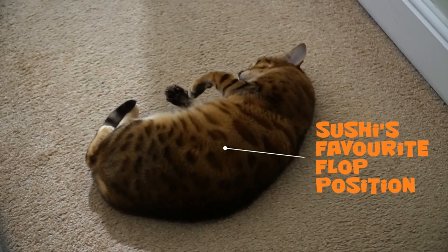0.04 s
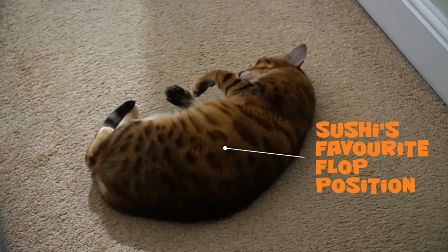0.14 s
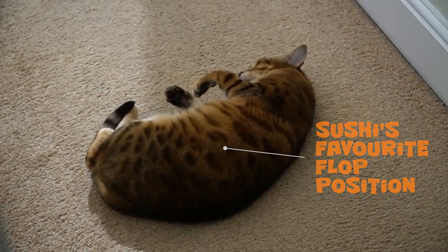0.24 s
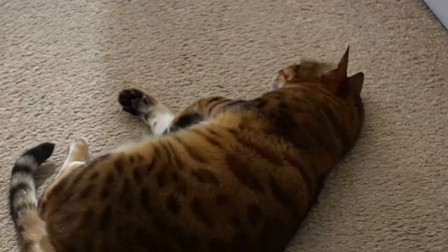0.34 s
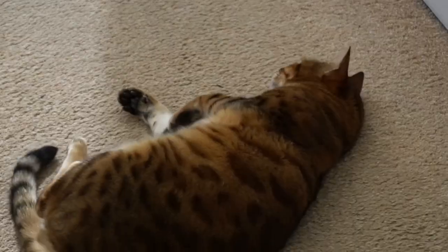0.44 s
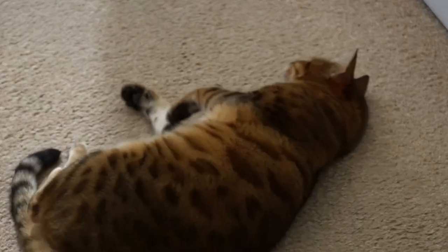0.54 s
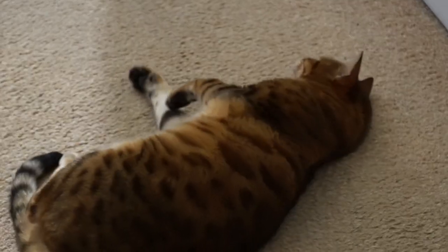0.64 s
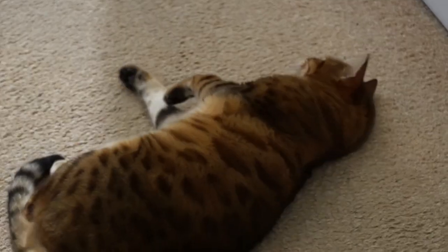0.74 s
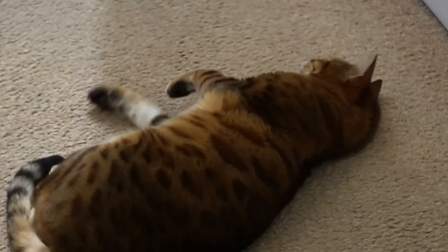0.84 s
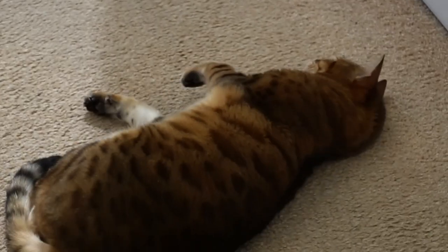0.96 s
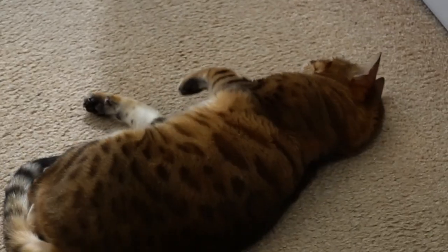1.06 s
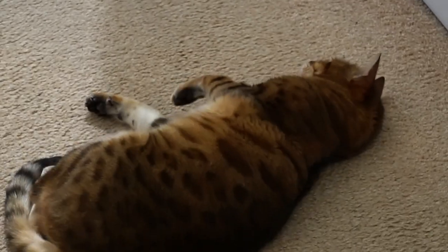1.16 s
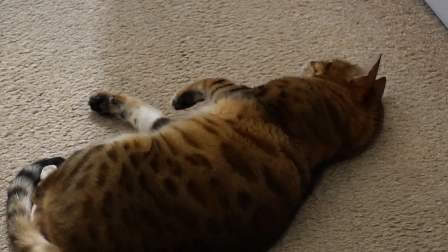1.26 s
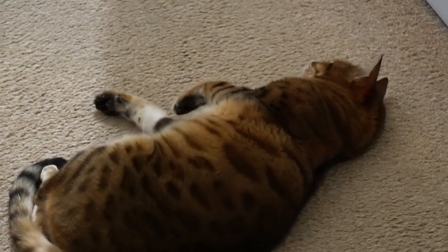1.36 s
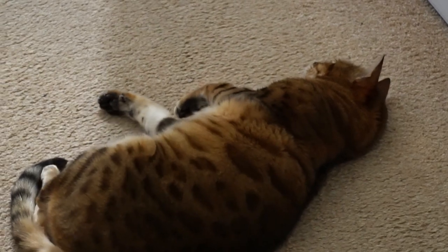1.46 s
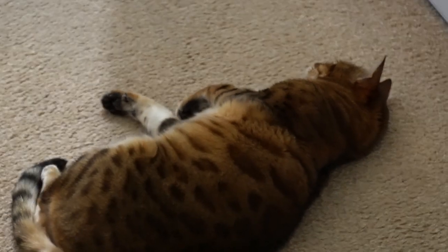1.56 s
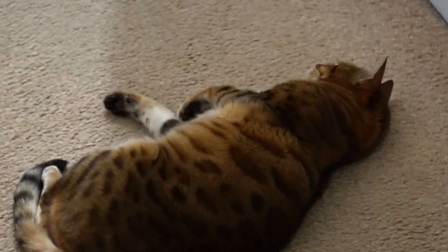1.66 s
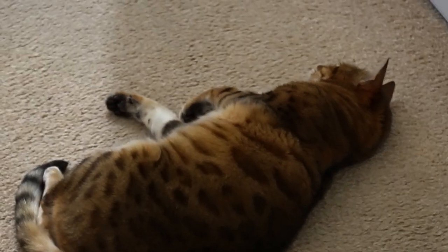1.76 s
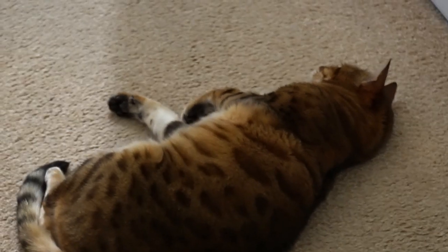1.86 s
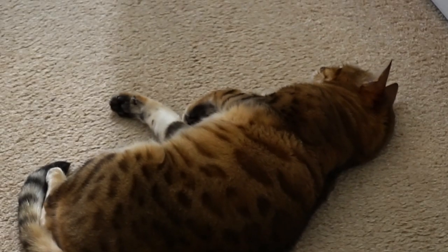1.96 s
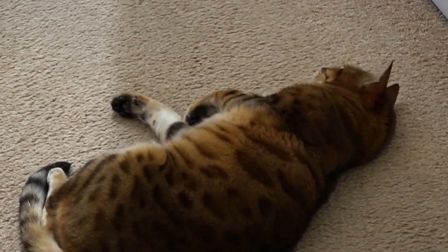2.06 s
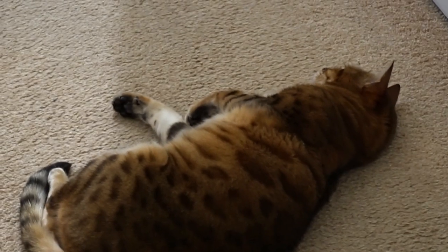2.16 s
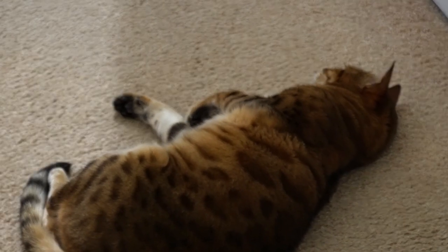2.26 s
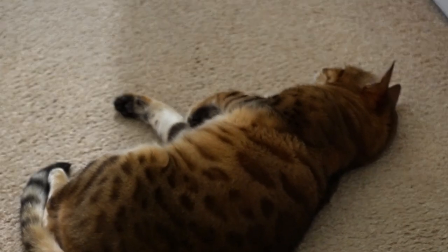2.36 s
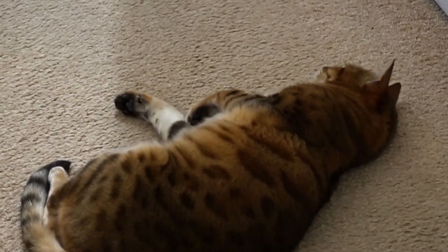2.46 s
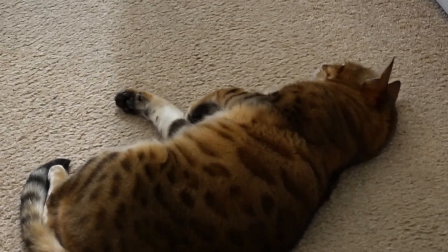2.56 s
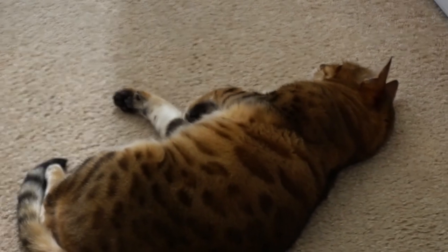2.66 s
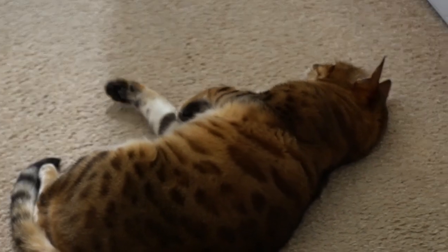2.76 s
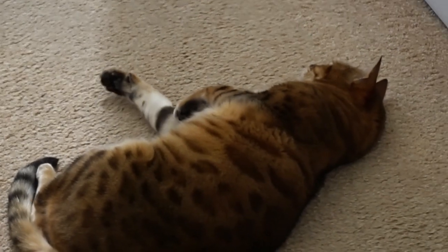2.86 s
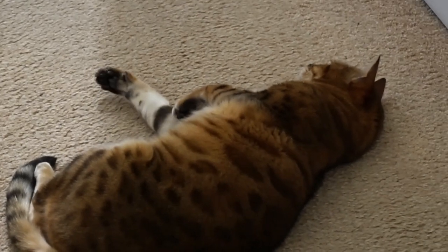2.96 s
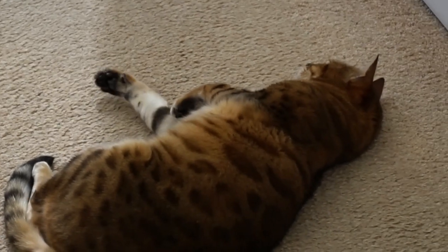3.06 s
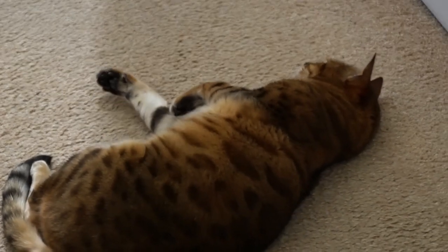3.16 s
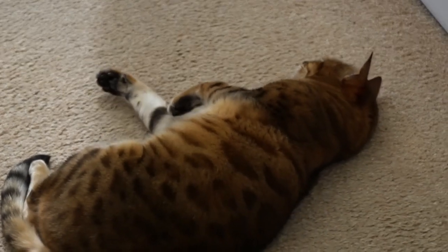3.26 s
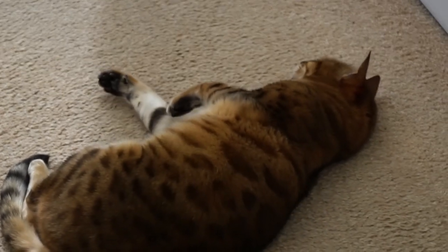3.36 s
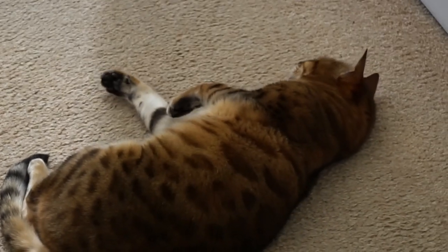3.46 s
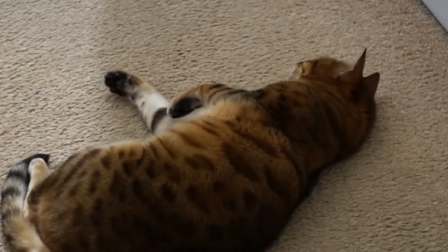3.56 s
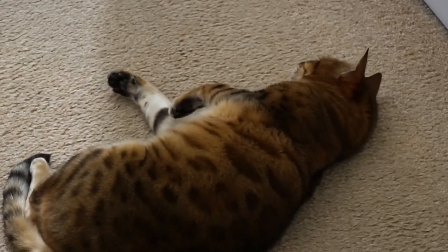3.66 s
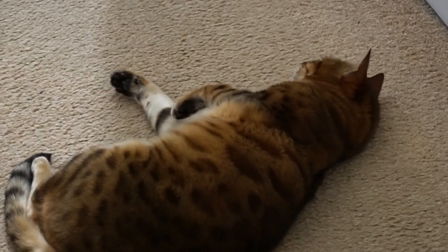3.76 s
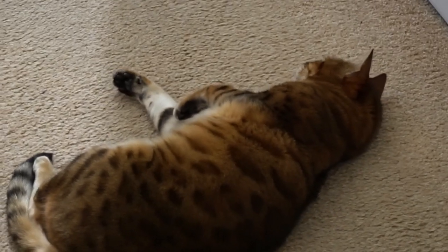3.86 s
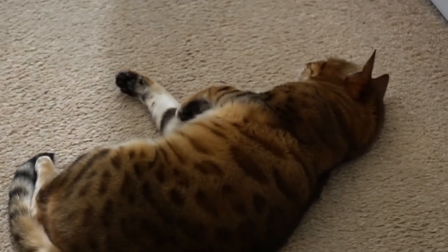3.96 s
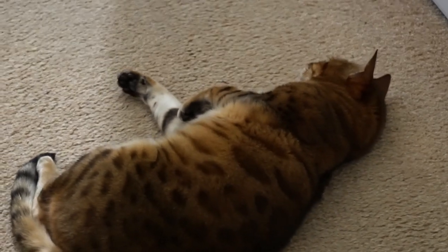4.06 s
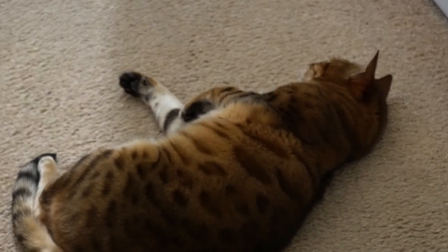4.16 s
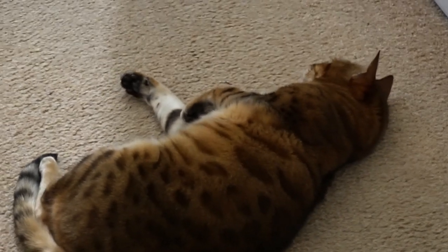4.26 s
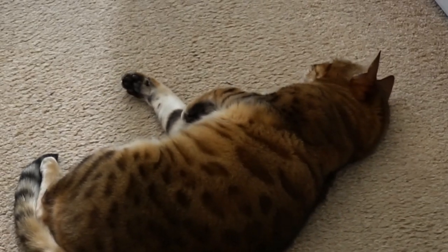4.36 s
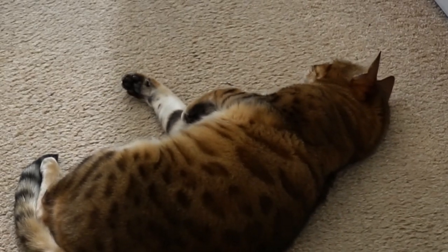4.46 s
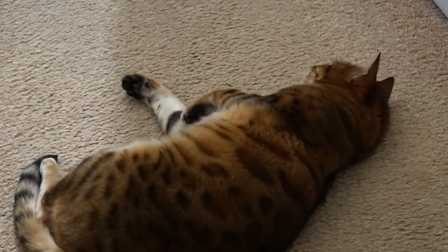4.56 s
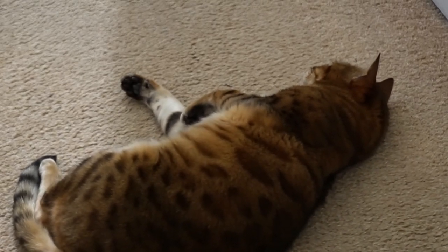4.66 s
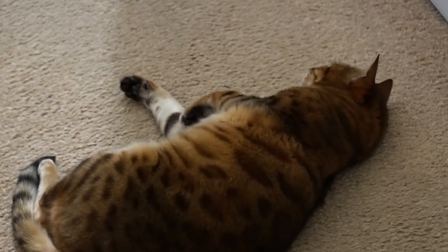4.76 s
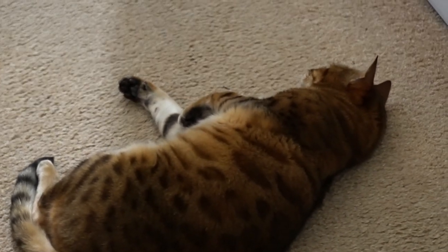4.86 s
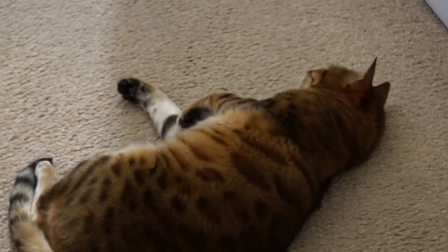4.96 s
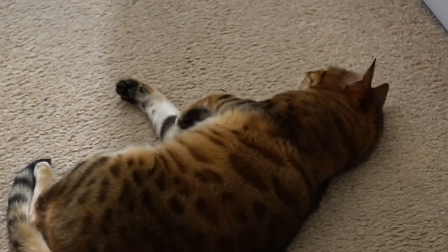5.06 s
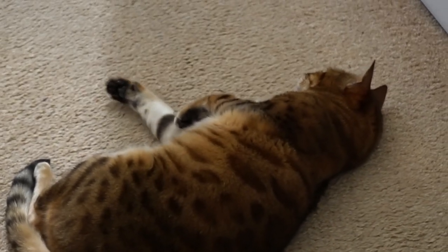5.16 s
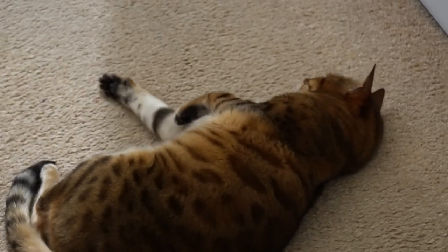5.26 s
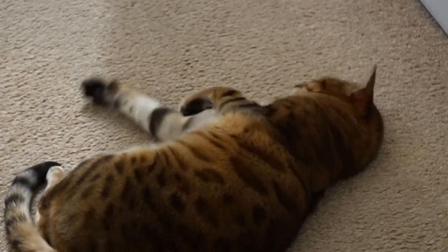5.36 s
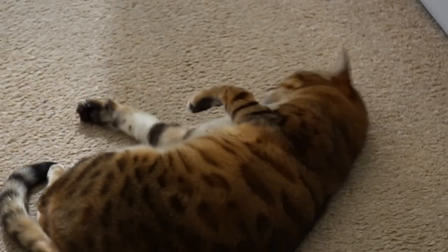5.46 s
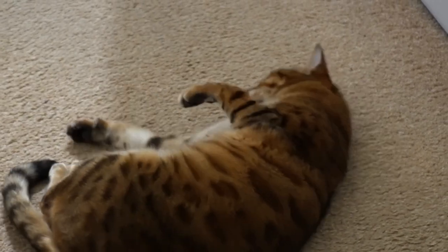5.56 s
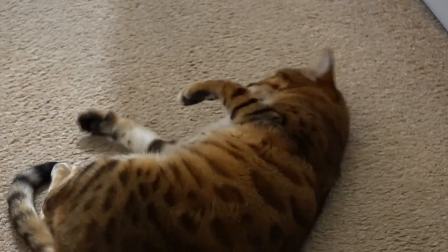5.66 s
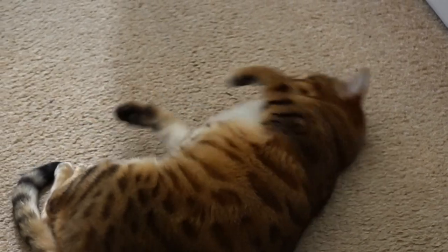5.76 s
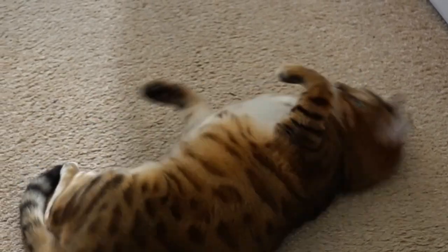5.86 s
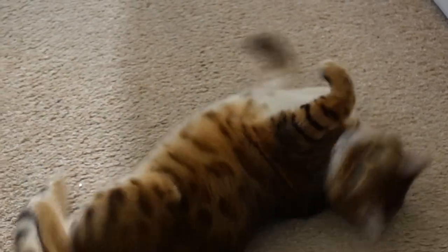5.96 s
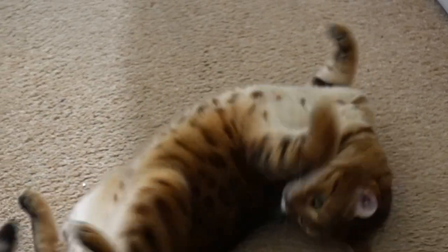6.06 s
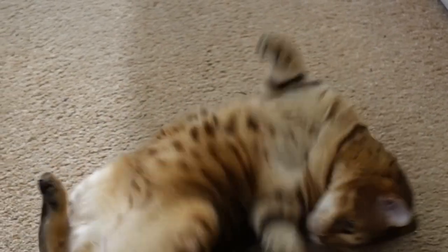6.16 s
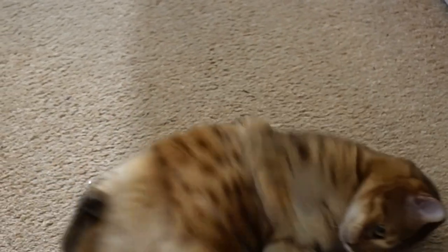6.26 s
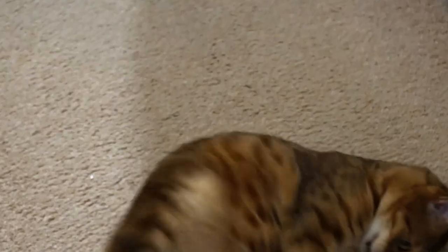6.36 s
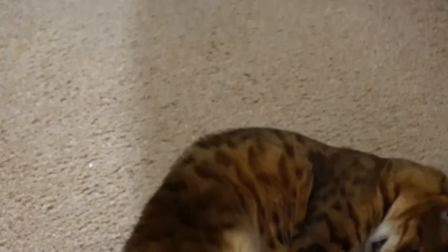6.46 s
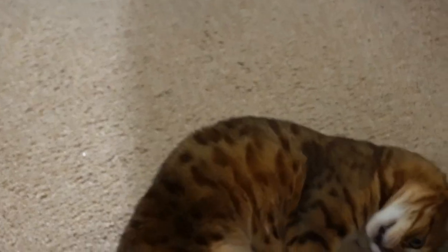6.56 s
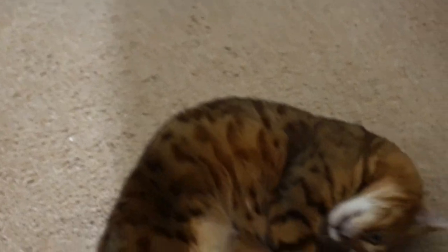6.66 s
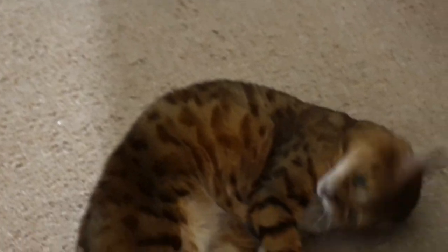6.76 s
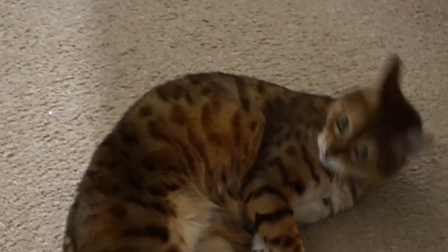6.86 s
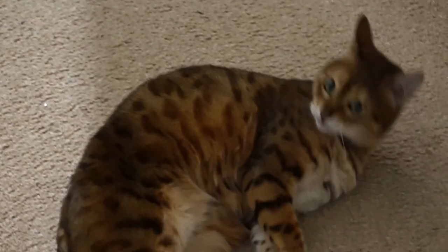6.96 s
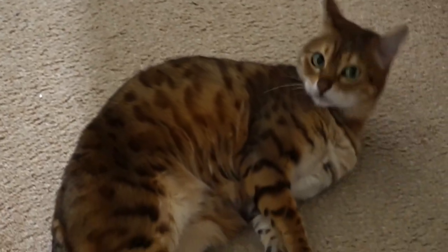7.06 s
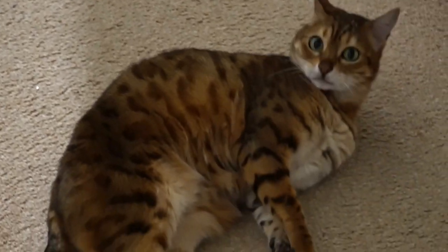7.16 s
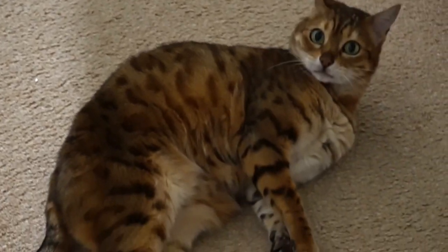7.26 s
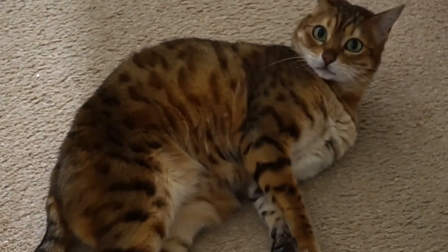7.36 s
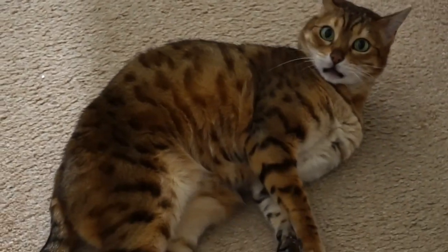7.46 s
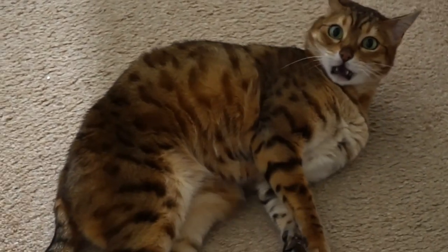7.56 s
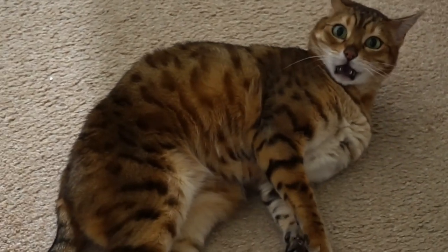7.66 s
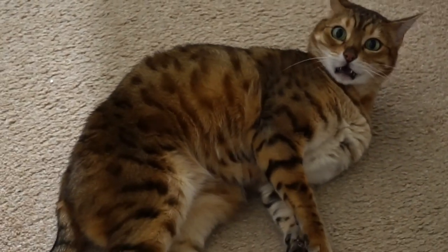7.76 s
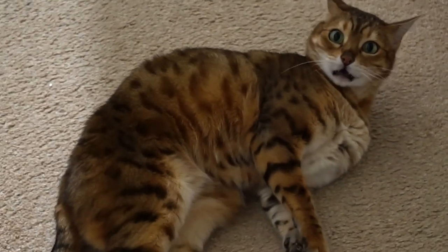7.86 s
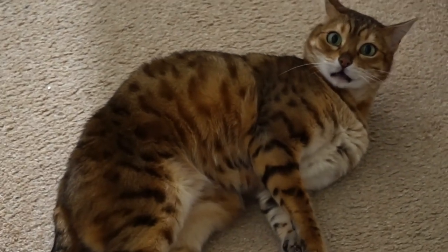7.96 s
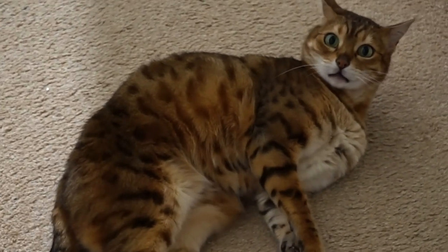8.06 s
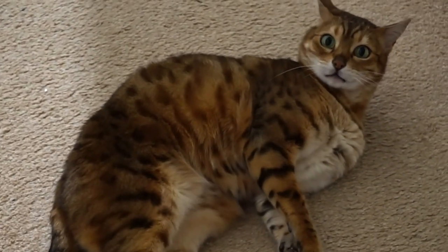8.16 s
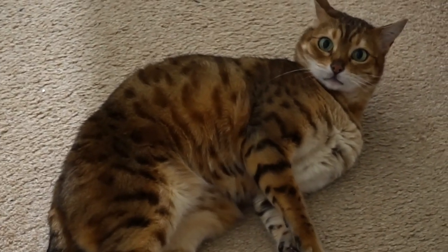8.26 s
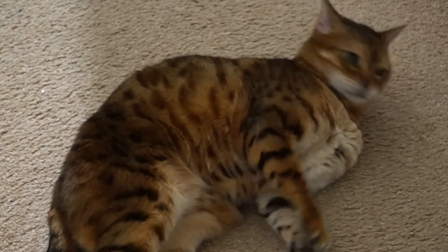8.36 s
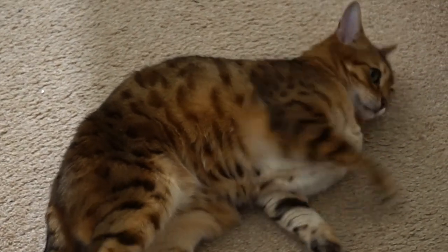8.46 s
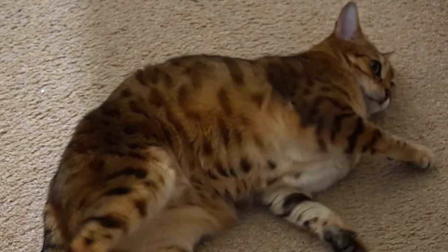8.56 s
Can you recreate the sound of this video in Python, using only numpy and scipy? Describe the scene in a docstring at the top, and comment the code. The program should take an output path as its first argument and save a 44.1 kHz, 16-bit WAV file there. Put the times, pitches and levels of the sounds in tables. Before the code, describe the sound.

A quiet carpeted room, with soft low house noise, faint wavering hum and thin hiss; the hiss drops slightly at about 0.4 seconds. At 0.5 a close cat starts hoarsely, with a rustle and lip smack, cracks upward and breaks into a bright, piercing meow that slides down until 1.1. Light fur scuffs and small ticks are scattered from 1.8 to 2.8. A second meow, at 3.1 to 3.8, rises fast and falls smoothly. Mostly calm follows, with sparse rustles, then a tiny closed-mouth grunt at 5.3. Rustling from 5.8 leads to a dull, soft floor thump at 6.25 as the cat rolls over, with weak settling bumps. A shorter meow comes at 6.4 to 6.9, then more rustles. The loudest, fullest meow runs from 7.4 to 8.2, closing with a barely perceptible high airy whistle. Each call leaves a short room tail; gentle low rumble swells near the end.

```python
"""A cat lying on a carpet meows four times in a quiet room; each call rises, then slides down as the mouth shuts.
The voice is a stack of harmonics, shaped by moving mouth and throat resonances and roughened by noise.
Puffs of noise make the rustles, short rings make the lip smacks and the thump as the cat rolls over.
Single gliding tones make a short grunt and a thin whistle of air; the room adds a fading tail.
Filtered noise and wavering tones make the steady hum and hiss of the house."""
import sys
import numpy as np
from scipy import signal
from scipy.fft import rfft, irfft
from scipy.io import wavfile
from scipy.ndimage import uniform_filter1d, minimum_filter1d

SR = 44100
rng = np.random.default_rng(int(sys.argv[2]) if len(sys.argv) > 2 else 0)


def output_pcm(signal):
    """Save a mono or channel-first signal as 16-bit PCM at the path in sys.argv[1].

    Samples are clipped to [-1, 1] before scaling.
    """
    pcm = np.clip(np.atleast_2d(signal).T, -1, 1) * 32767
    wavfile.write(sys.argv[1], SR, np.round(pcm).astype(np.int16))


N = 379701  # length of the scene in samples

# Levels of the cat's sounds (voice, rustles, smacks, thump) are set before scene() mixes them.
# House noise: spectrum, relative [f/Hz, level/dB per Hz]
HOUSE_SPECTRUM = [(14, -36), (38, 4.5), (62, -1.5), (120, -4.5), (160, 2.5), (200, -2), (300, -3),
                  (500, -8), (760, -10), (1500, -16), (2800, -23), (3900, -18.5), (4450, -25),
                  (5200, -31.5)]
# Treble hiss: spectrum, relative [f/Hz, level/dB per Hz]
HISS_SPECTRUM = [(5200, -0.5), (7000, -3), (10000, -6), (13000, -5), (15900, -5)]
# Depth of the drifting patches in the house noise [f/Hz, depth/dB]
PATCH_DEPTHS = [(100, .4), (500, 1.6), (2500, 1.4), (5000, .5), (16000, .3)]
# Swells of the low rumble [t/s, half length/s, height/dB]
RUMBLE_SURGES = [(.6, .2, 6.5), (5.8, .3, 0.5), (7.8, .2, 11), (8.5, 0.14, 14)]
# Wavering hum lines [f/Hz, level/dB]
HUM_LINES = [(161.5, -63), (236.9, -64.5), (726.7, -71), (1114, -72.5), (3854, -81), (4307, -77.5),
             (8156, -91.5), (12500, -86)]

# Voiced stretches, one table each; the first meow breaks in two after a hoarse start
# [t/s, pitch f/Hz, first mouth resonance f/Hz, its level/dB, second resonance f/Hz, its level/dB]
MEOW_PATHS = [
    [(0.46, 271, 1360, -69, 2560, -78), (0.476, 280, 1370, -58, 2580, -70),
     (0.494, 303, 1390, -45, 2580, -86), (0.522, 319.4, 1420, -42, 2450, -75),
     (0.54, 346.6, 1580, -43, 2450, -57), (0.554, 375, 1750, -45, 2440, -60),
     (0.568, 404, 1800, -46, 2420, -42), (0.6, 486, 1883, -43, 2400, -34),
     (0.618, 552, 1730, -52, 2680, -34), (0.635, 575.9, 1630, -42, 2850, -39)],
    [(0.625, 571, 1680, -43, 2760, -52), (0.681, 554, 1700, -36, 2900, -12.5),
     (0.701, 563.7, 1930, -31, 2730, -17.5), (0.719, 539, 2080, -20, 2720, -13),
     (0.733, 532, 2050, -28, 2640, -16), (0.753, 521, 1970, -21, 2590, -20.5),
     (0.785, 500.7, 1915, -20, 2410, -19.5), (0.833, 464.7, 1430, -23, 2400, -37),
     (0.849, 471.2, 1480, -26, 2430, -32.5), (0.915, 427.2, 1430, -38, 2430, -49.5),
     (0.991, 397.6, 1200, -45.5, 2430, -54.5), (1.015, 383, 1220, -49, 2480, -58),
     (1.031, 343.5, 1230, -49, 2470, -58), (1.09, 317.6, 1360, -61, 2520, -68)],
    [(3.08, 261, 1850, -61, 2340, -63.5), (3.144, 309.7, 1270, -58, 2270, -72),
     (3.164, 370, 1240, -47, 2190, -66.5), (3.194, 395, 1320, -31, 2180, -58),
     (3.21, 443, 1570, -36, 2220, -33), (3.23, 466, 1660, -24.5, 2380, -45.5),
     (3.266, 503.4, 1670, -28.5, 2500, -28), (3.31, 520.5, 2010, -29, 2580, -25.5),
     (3.404, 480.2, 1760, -24.5, 2480, -32), (3.536, 437.6, 1300, -26, 2140, -44.5),
     (3.634, 414, 1256, -27, 2056, -48.5), (3.716, 353.7, 1346, -50, 2140, -61),
     (3.746, 308, 1319, -51.5, 2280, -72), (3.8, 314.1, 1286, -59, 2380, -81)],
    [(6.37, 334, 1520, -43, 2430, -65), (6.392, 375, 1400, -33.5, 2450, -44),
     (6.426, 440, 1540, -41, 2470, -32.5), (6.498, 475.9, 1800, -28, 2640, -25),
     (6.568, 484.6, 1850, -26.5, 2770, -23), (6.588, 483, 1870, -22.5, 2760, -34),
     (6.616, 485, 1780, -29.5, 2520, -26), (6.646, 453.7, 1630, -30.5, 2390, -34.5),
     (6.678, 449.5, 1310, -31, 2180, -34), (6.702, 439, 1330, -33, 2180, -39),
     (6.744, 379.3, 1300, -39.5, 2180, -56), (6.792, 372.9, 1360, -61, 2190, -52),
     (6.812, 340, 1390, -49.5, 2200, -56), (6.86, 326.0, 1380, -53, 2270, -66)],
    [(7.43, 270.5, 1400, -72, 2670, -81), (7.452, 266.4, 1350, -50.5, 2210, -70),
     (7.54, 413.6, 1596, -17.5, 2470, -38.5), (7.598, 457.4, 1790, -10, 2670, -17),
     (7.642, 468.4, 1810, -14.5, 2700, -16.5), (7.674, 473.1, 1890, -11, 2570, -20.5),
     (7.732, 468, 1900, -12, 2720, -26.5), (7.802, 458.3, 1567, -18, 2410, -25),
     (7.876, 449, 1280, -11.5, 2300, -42), (7.888, 449.7, 1360, -18, 2250, -31),
     (7.95, 444.2, 1400, -22.5, 2140, -27), (8.058, 424.2, 1540, -36.5, 2105, -55),
     (8.142, 340, 1236, -43, 2170, -66), (8.19, 322, 1300, -45.5, 2340, -68)],
]
# Colour of each stretch at REFERENCE_DB [lowest tone level/dB, its octave level/dB, third resonance level/dB,
# its f/Hz with the mouth open, upper throat resonance level/dB, its f/Hz at the start, its f/Hz at the end]
MEOW_COLOURS = [(-44, -38.5, -28, 3900, -68, 5500, 5400), (-40, -34, -42, 3800, -70.5, 5500, 6840),
                (-45, -35.5, -45.5, 3740, -83, 4940, 6100), (-45, -44, -32.5, 3760, -78, 4400, 7300),
                (-47.5, -39.5, -62.5, 3700, -75, 4900, 7000)]
# Drift over each stretch as sound moves from mouth to nose
# [lowest tone change/dB, its octave change/dB, lips part t/s]
NOSE_DRIFTS = [(-5, -5, .555), (7.5, 14, .655), (0.5, -0.5, 3.17), (2, 5.5, 6.383), (8.5, 5, 7.485)]
# One swell of the upper resonance in each stretch [t/s, half length/s, height/dB]
THROAT_SWELLS = [(0.605, 0.044, 20), (0.793, 0.12, 15.5), (3.448, 0.19, 17.5), (6.58, 0.12, 13),
                 (7.82, 0.32, 16.5)]
# Fixed throat modes that follow the upper resonance [f/Hz, width/Hz, level against it/dB]
TOP_MODES = [(5240, 200, -5), (9000, 2400, -36), (14300, 2000, -23.5)]
# Dip between the third and upper resonances [f/Hz, half width/Hz, height/dB]
THROAT_GAP = (4750, 730, -5)
# Nose resonance: lifts the lowest tone as it slides past [f/Hz, half width/Hz, height/dB]
NOSE_LIFT = (387, 100, 4.2)
# Moments when the voice catches [t/s, half length/s, added roughness 0-1]
VOICE_CATCHES = [(.52, .04, .15), (.585, .035, .5), (.715, .01, .18), (.8, .08, .12), (1.04, .05, .1),
                 (3.2, .05, .1), (3.72, .04, .1), (6.41, .02, .08), (6.455, .012, .2), (6.62, .02, .25),
                 (7.56, .04, .06)]
# How long the room rings: time to fall by 60 dB [f/Hz, fall time/s]
ROOM_FALL = [(200, 0.52), (500, 0.34), (1200, 0.3), (3000, 0.23), (8000, 0.23)]

# Rustles of fur and carpet [t/s, level/dB, length/s (held to 0.01-0.09), slope above 1.5 kHz/dB per octave]
RUSTLE_EVENTS = [(0.521, -35, 0.031, 3.5), (0.562, -31.5, 0.079, 2.5), (1.028, -40.5, 0.053, 7.5),
                 (1.842, -35.5, 0.029, -20), (1.893, -34, 0.027, -10), (1.949, -40, 0.034, -13),
                 (2.024, -44, 0.027, -5), (2.233, -28.5, 0.058, 0.5), (2.549, -58, 0.052, -1),
                 (2.631, -35.5, 0.021, -6), (2.782, -39.5, 0.021, -17), (3.927, -31.5, 0.025, -29.5),
                 (4.496, -40.5, 0.044, -1), (5.372, -37, 0.051, -3), (5.832, -37.5, 0.06, -4),
                 (5.997, -39.5, 0.088, -3), (6.159, -36.5, 0.071, -5), (6.283, -37, 0.11, 3.5),
                 (6.791, -40, 0.035, 6.5), (7.133, -34, 0.034, -7), (7.326, -42.5, 0.058, -13)]
# Rustle spectrum, relative [f/Hz, level/dB per Hz]
RUSTLE_SPECTRUM = [(120, -34), (250, 1), (550, -13.5), (900, -1), (1400, -13.5), (2200, -9.5),
                   (3200, -16.5), (4100, -12.5), (5300, -31.5), (15000, -47.5)]
# Lip smacks and ticks [t/s, level/dB, ring f/Hz, share of broad click]
SMACK_EVENTS = [(0.5674, -45, 2310, 0.14), (0.576, -28, 2340, 0.086), (1.022, -33.5, 3820, 0.083),
                (2.241, -34, 1470, 0.16), (3.162, -39, 3624, .1), (6.3833, -32.5, 3720, 0.3),
                (7.472, -44, 4440, 0.42), (8.135, -42, 13300, 0.089)]
# Short closed-mouth grunt [t/s, pitch f/Hz, level/dB]
GRUNT_PATH = [(5.31, 450, -82), (5.332, 400, -45.5), (5.39, 300, -51), (5.42, 297, -59)]
# Landing and two settling bumps [t/s, peak level/dB]
THUMP_EVENTS = [(6.2494, -15.5), (6.285, -41), (6.454, -31.5)]
# Rings of the floor under the carpet [f/Hz, relative level/dB, time to fall by 60 dB/s]
FLOOR_RINGS = [(98.5, -14, 0.25), (119, 5, 0.14), (223, 2.5, 0.077), (273, 13.5, 0.034), (322, 2, 0.1),
               (441, -6, 0.25), (470, 5.5, 0.047)]
# Thin whistle of air as the last meow closes [t/s, pitch f/Hz, level/dB]
WHISTLE_PATH = [(7.88, 14800, -84), (7.97, 14500, -80), (8.07, 13300, -81), (8.16, 13150, -81)]

HOUSE_DB = -51.5
HISS_EARLY_DB, HISS_DB, HISS_STEP_S = -65.5, -70.5, 0.375  # the hiss steps down early
RUMBLE_DB, RUMBLE_SWELL_DB = -60.5, 1.5  # middle level, typical slow swell
ROOM_DB = -5
LIMIT_DB, EDGE_HZ = -5.5, 15700  # where the limiter starts, top of the sound

FIRST_WIDTH_HZ, SECOND_WIDTH_HZ, THIRD_WIDTH_HZ, UPPER_WIDTH_HZ = 470, 520, 650, 700
SHUT_HZ, OPEN_HZ = 1300, 1880  # first resonance with the mouth nearly shut and wide open
THIRD_SHUT_HZ = 3200  # third resonance with the mouth nearly shut
REFERENCE_DB = -25  # mouth level at which the colours hold
# dB of change per dB of mouth level (for the third: per dB of the second resonance)
LOW_FOLLOWS, OCTAVE_FOLLOWS, THIRD_FOLLOWS, UPPER_FOLLOWS = 0.08, .35, 1.28, .5
RIPPLE_DB = 4  # full depth of the fine ripple that near reflections lay over the treble
SEALED_DB, PARTING_S = -11.5, .012  # damping behind closed lips, time they take to part
ATTACK_S, RELEASE_S = 0.016, 0.055
# The folds close unevenly when the voice is weak: roughness 0-1 at two mouth levels
ROUGH_WEAK, ROUGH_STEADY, WEAK_DB, FIRM_DB = .2, .03, -48, -25


def gain_of(db):
    """Turns decibels into a plain multiplier."""
    return 10 ** (np.asarray(db) / 20)


def evened(x):
    """Scales x to an rms of 1."""
    return x / np.sqrt(np.mean(x ** 2) + 1e-20)


def read(points, hz):
    """Reads a table against frequency, in straight lines on a log-frequency axis."""
    f, value = np.transpose(points)
    return np.interp(np.log(hz + 1), np.log(f + 1), value)


def curves(rows):
    """Start time, and every other column drawn out sample by sample."""
    s, *columns = np.transpose(rows)
    t = np.arange(s[0], s[-1], 1 / SR)
    return s[0], [np.interp(t, s, column) for column in columns]


def add(mix, s, sound):
    """Lays a sound into the mix at s seconds."""
    part = mix[round(s * SR):][:len(sound)]
    part += sound[:len(part)]


def coloured(x, db_of_hz):
    """Filters x by a dB gain that is a function of frequency."""
    hz = np.fft.rfftfreq(len(x), 1 / SR)
    return irfft(rfft(x) * gain_of(db_of_hz(hz)), len(x))


def smoothed(x, span):
    """Two running averages along the last axis."""
    return uniform_filter1d(uniform_filter1d(x, span), span)


def wander(count, span):
    """A slow random curve of rms 1; a longer span in samples makes it slower."""
    return evened(smoothed(rng.standard_normal(count), span))


def bumps(x, rows):
    """Sum of smooth bumps (centre, half width, height)."""
    return sum(height * np.exp(-((x - at) / half) ** 2) for at, half, height in rows)


def tone(rows, waver, overtone):
    """A single wavering tone that fades in and out, with an overtone an octave up."""
    s, (hz, level_db) = curves(rows)
    phase = 2 * np.pi * np.cumsum(hz * (1 + waver * wander(len(hz), span=80))) / SR
    wave = np.sqrt(2) * (np.sin(phase) + overtone * np.sin(2 * phase))
    return s, gain_of(level_db) * wave * signal.windows.tukey(len(hz), .3)


def patchy_noise():
    """Random noise whose strength drifts in patches over time and frequency."""
    frames, hz = N // 256 + 5, np.fft.rfftfreq(1024, 1 / SR)
    a, b, patches = rng.standard_normal((frames, 513, 3)).T
    patches = evened(uniform_filter1d(uniform_filter1d(patches, 14, 0), 12, 1))
    patch_gain = gain_of(read(PATCH_DEPTHS, hz)[:, None] * patches)
    return signal.istft((a + 1j * b) * patch_gain, nperseg=1024, noverlap=768)[1][:N]


def house():
    """Patchy noise in three bands (room noise, treble hiss, low rumble) under wavering hum lines."""
    noise = patchy_noise()
    t, out = np.arange(N) / SR, np.zeros(N)
    hiss_db = np.where(t < HISS_STEP_S, HISS_EARLY_DB, HISS_DB)
    rumble_db = RUMBLE_DB + RUMBLE_SWELL_DB * wander(N, span=5000) + bumps(t, RUMBLE_SURGES)
    bands = (  # from Hz, to Hz, spectrum, level
        (85, 5200, HOUSE_SPECTRUM, HOUSE_DB),
        (5200, SR, HISS_SPECTRUM, hiss_db),
        (0, 85, HOUSE_SPECTRUM, rumble_db))
    for lo, hi, shape, level_db in bands:
        band = coloured(noise, lambda f: np.where((f >= lo) & (f < hi), read(shape, f), -200))
        out += evened(band) * gain_of(level_db)
    for f, db in HUM_LINES:
        wavering_hz = f + (5 + 0.0037 * f) * wander(N, span=1200)
        phase = 2 * np.pi * np.cumsum(wavering_hz) / SR
        out += gain_of(db + 3.0 * wander(N, span=2500)) * np.sqrt(2) * np.sin(phase)
    return out


def peak(hz, centre, width, steep):
    """Gain of a resonance; the harmonics from the third up share a total power of 1."""
    shape = (1 + (2 * (hz - centre) / width) ** 2) ** -steep
    return shape / np.linalg.norm(shape[2:], axis=0)


def uneven_closing(count, k, rough):
    """Uneven closing of the folds spreads noise round each harmonic, more round the high ones."""
    shake = rng.standard_normal((count, len(k), 2)).T
    shake = evened(smoothed(shake, 50)) / np.sqrt(2)
    share = np.minimum(rough * (k / 4) ** .7, 1)
    return np.sqrt(1 - share ** 2) + share * (shake[0] + 1j * shake[1])


def meow(rows, colour, drift):
    """Harmonics of the vocal folds, weighted by mouth and throat resonances that move as the jaw does."""
    s, (hz, f1, db1, f2, db2) = curves(rows)
    low_start_db, octave_start_db, third_db, third_open_hz, throat_db, *throat_ends_hz = colour
    low_drift_db, octave_drift_db, lips_part_s = drift
    count = len(hz)
    t = np.arange(count) / SR
    along = np.linspace(-1, 1, count)

    # where the higher resonances lie
    opening = np.clip((f1 - SHUT_HZ) / (OPEN_HZ - SHUT_HZ), 0, 1)
    f3 = THIRD_SHUT_HZ + (third_open_hz - THIRD_SHUT_HZ) * opening
    upper_hz = np.linspace(*throat_ends_hz, count)

    # how the other levels follow the mouth
    mouth_db = 10 * np.log10(gain_of(db1) ** 2 + gain_of(db2) ** 2)
    push_db = mouth_db - REFERENCE_DB
    low_db = low_start_db + LOW_FOLLOWS * push_db + low_drift_db * along / 2 + bumps(hz, [NOSE_LIFT])
    octave_db = octave_start_db + OCTAVE_FOLLOWS * push_db + octave_drift_db * along / 2
    db3 = third_db + THIRD_FOLLOWS * (db2 - REFERENCE_DB)
    upper_db = throat_db + UPPER_FOLLOWS * push_db + bumps(s + t, THROAT_SWELLS)

    # roughness also makes the pitch unsteady
    rough = np.interp(mouth_db, (WEAK_DB, FIRM_DB), (ROUGH_WEAK, ROUGH_STEADY))
    rough = np.clip(rough + bumps(s + t, VOICE_CATCHES), 0, 1)
    turns = np.cumsum(hz * (1 + (.0007 + 0.055 * rough) * wander(count, span=120))) / SR

    # strength of each harmonic
    k = np.arange(1, 36)[:, None]
    tones = k * hz
    heights = gain_of(db1) * peak(tones, f1, FIRST_WIDTH_HZ, 1.27)
    heights += gain_of(db2) * peak(tones, f2, SECOND_WIDTH_HZ, 1.44)
    heights += gain_of(db3) * peak(tones, f3, THIRD_WIDTH_HZ, 1.1)
    heights += gain_of(upper_db) * peak(tones, upper_hz, UPPER_WIDTH_HZ, 1.5)
    for f, width, db in TOP_MODES:
        heights += gain_of(upper_db + db) * peak(tones, f, width, 2.5)
    ripple = np.interp(tones, np.arange(4096) * SR / 8192, wander(4096, span=40))
    heights *= gain_of(RIPPLE_DB * ripple * np.clip(tones / 2500 - 1, 0, 1))
    sealed = np.clip((lips_part_s - s - t) / PARTING_S, 0, 1)
    heights *= gain_of(bumps(tones, [THROAT_GAP]) + SEALED_DB * sealed)
    heights[:2] = gain_of([low_db, octave_db])  # the two lowest tones have levels of their own
    heights *= np.sqrt(2) * (tones < EDGE_HZ)

    # the k-squared phase keeps the harmonics from all peaking together
    carrier = np.exp(2j * np.pi * k * turns + 1j * np.pi * k ** 2 / 9)
    voice = (heights * carrier * uneven_closing(count, k, rough)).real.sum(0)
    fade = np.clip(np.minimum(t / ATTACK_S, t[::-1] / RELEASE_S), 0, 1) ** 2
    return s, voice * fade


def room(x):
    """Echoes off the room: sparse taps of random sign that die band by band."""
    taps = np.zeros(SR // 2)
    at = np.arange(200, SR // 2 - 20, 20) + rng.integers(0, 20, (SR // 2 - 201) // 20)
    taps[at] = rng.choice([-1., 1.], len(at))
    hz, t, bands = signal.stft(taps, SR, nperseg=256)
    fall_s = np.maximum(read(ROOM_FALL, hz), .05)[:, None]
    tail = signal.istft(bands * gain_of(-60 * t / fall_s), SR, nperseg=256)[1]
    return signal.fftconvolve(x, tail / np.linalg.norm(tail))[:N]


def rustle(s, level_db, length, tilt_db):
    """Fur on carpet: a lumpy puff of noise with a quick start and a soft end."""
    noise, lumps = rng.standard_normal(8192), wander(8192, span=60)
    u = np.arange(8192) / SR / np.clip(length, .01, .09)  # time in puff lengths

    def spectrum(hz):
        """Rustle spectrum with its treble tilted."""
        return read(RUSTLE_SPECTRUM, hz) + tilt_db * np.log2(np.maximum(hz / 1500, 1))

    puff = evened(coloured(noise, spectrum))
    envelope = u ** .5 * np.exp(-u ** 2 * 1.05)
    return s, gain_of(level_db - 8.5 + 2.4 * lumps) * puff * envelope


def smack(s, level_db, hz, click):
    """A lip smack or tick: a brief ring over a broad, slightly dull click."""
    t = np.arange(900) / SR
    ring = np.sin(2 * np.pi * hz * t) * gain_of(-60 * t / 0.01) * np.minimum(t / 0.0011, 1)
    crack = signal.lfilter([1, .7], 1, rng.standard_normal(900)) * gain_of(-60 * t / .006)
    return s, gain_of(level_db) * (ring + click * crack)


def grunt():
    """A closed-mouth grunt: one falling, wavering tone with a weak overtone."""
    return tone(GRUNT_PATH, waver=0.011, overtone=0.076)


def thump(s, peak_db):
    """The body lands: a soft blow rings the floor under the carpet."""
    t = np.arange(SR // 3) / SR
    ring = sum(gain_of(db - 60 * t / fall_s) * np.sin(2 * np.pi * hz * t) for hz, db, fall_s in FLOOR_RINGS)
    ring *= np.minimum(t / 0.0032, 1) ** 2  # the soft start
    return s, gain_of(peak_db) * ring / abs(ring).max()


def whistle():
    """Air whistling thinly: one very high, gliding tone without an overtone."""
    return tone(WHISTLE_PATH, waver=.005, overtone=0)


def scene():
    """Adds up the cat's sounds, their echoes in the room and the house."""
    near = np.zeros(N)
    for row in zip(MEOW_PATHS, MEOW_COLOURS, NOSE_DRIFTS):
        add(near, *meow(*row))
    for play, table in ((rustle, RUSTLE_EVENTS), (smack, SMACK_EVENTS), (thump, THUMP_EVENTS)):
        for row in table:
            add(near, *play(*row))
    add(near, *grunt())
    add(near, *whistle())
    return (gain_of(-1.0) * near + gain_of(ROOM_DB) * room(near) + house())[None]


def record(dry):
    """A peak limiter takes off 0.8 of the dB above LIMIT_DB; then the top is cut at EDGE_HZ."""
    peak_db = -minimum_filter1d(-20 * np.log10(abs(dry) + 1e-9), 441)  # loudest sample nearby
    excess_db = uniform_filter1d(np.maximum(peak_db - LIMIT_DB, 0), 301)
    held = dry / gain_of(.8 * excess_db)
    low_pass = signal.firwin(511, EDGE_HZ, window=("kaiser", 9), fs=SR)
    return signal.oaconvolve(held, low_pass[None], "same")


dry = scene()
out = record(dry)
output_pcm(out)
```